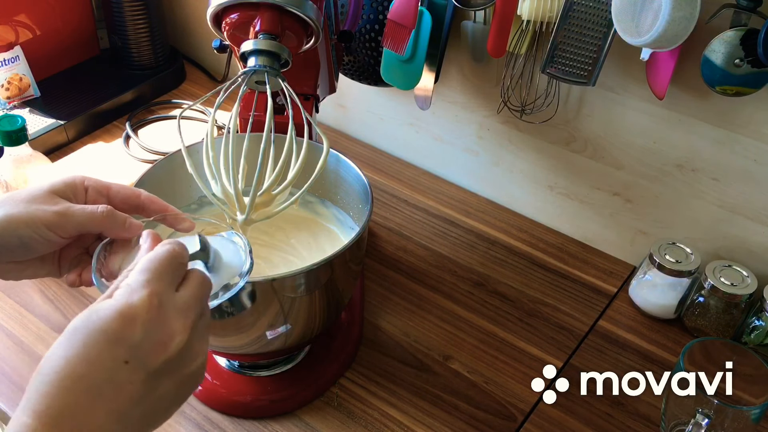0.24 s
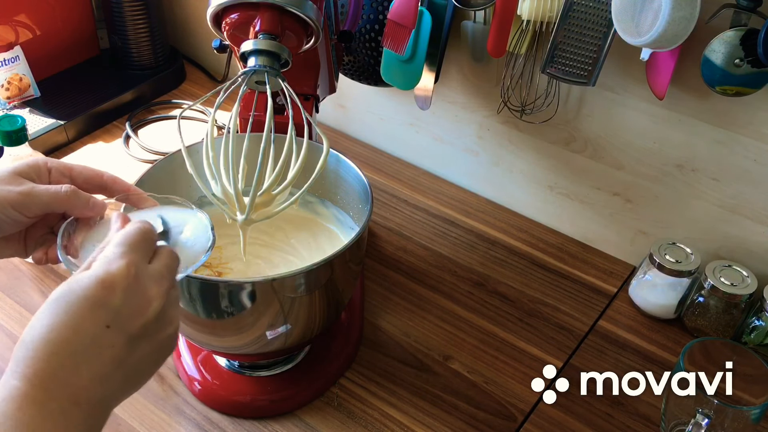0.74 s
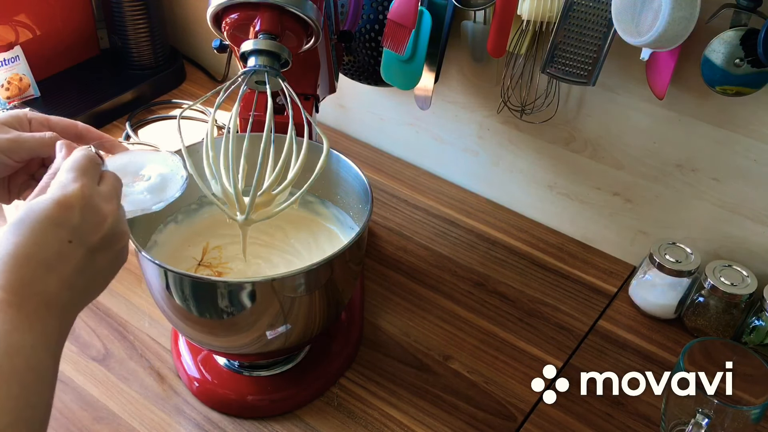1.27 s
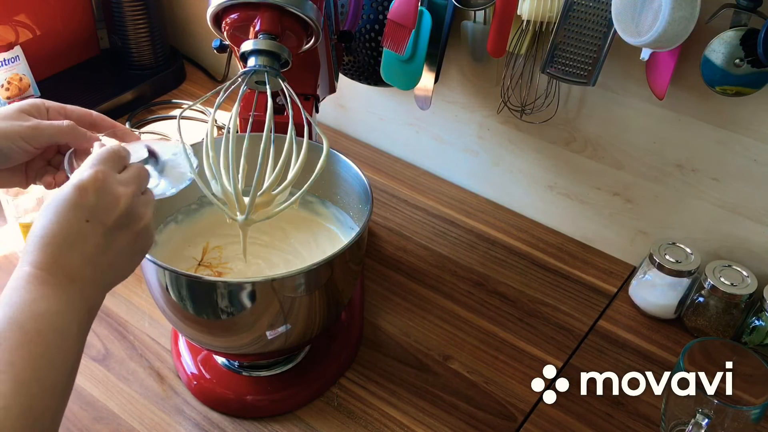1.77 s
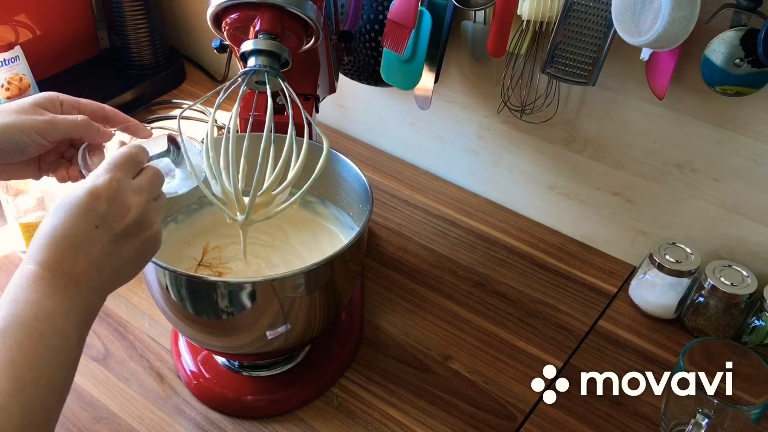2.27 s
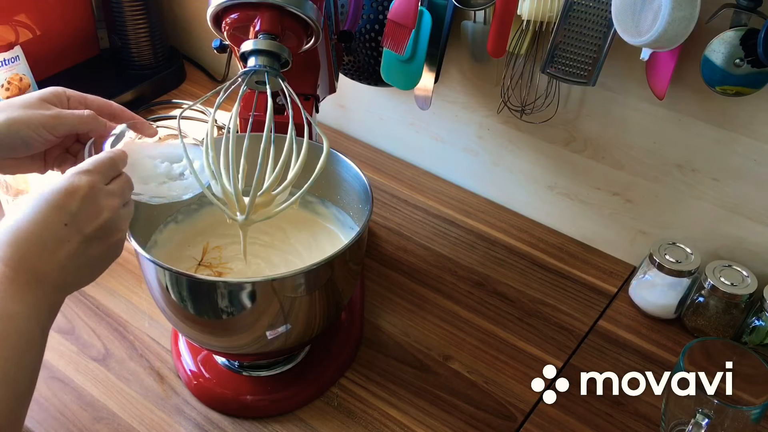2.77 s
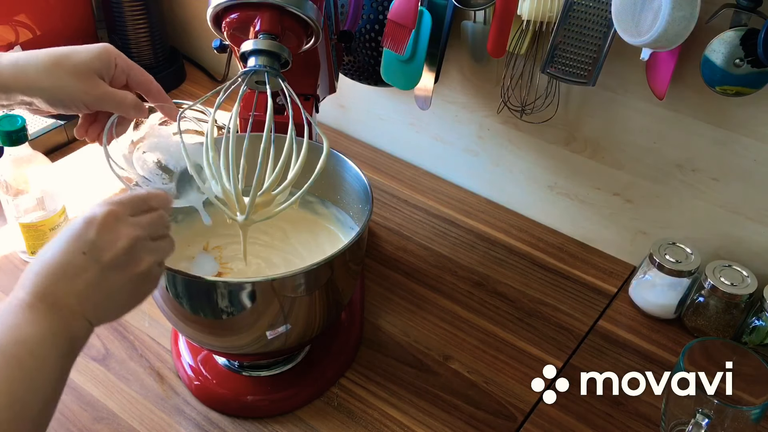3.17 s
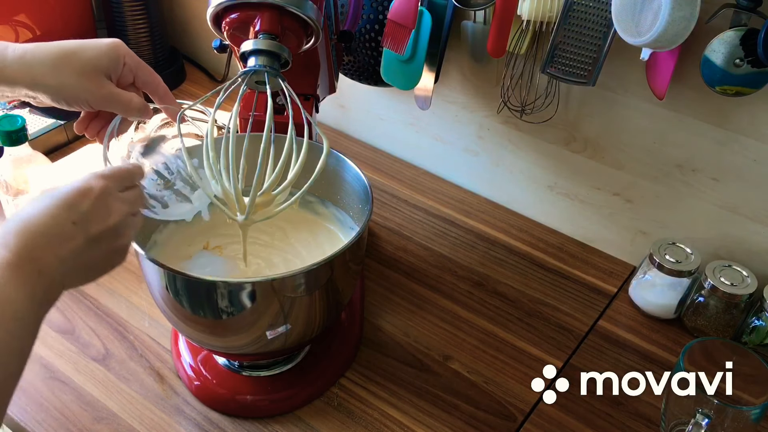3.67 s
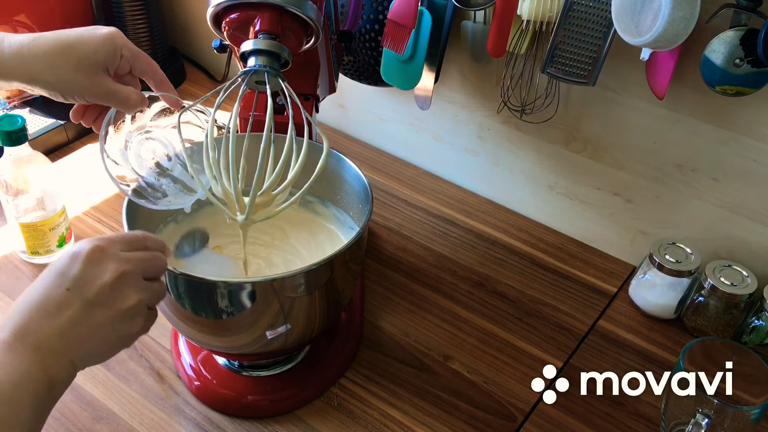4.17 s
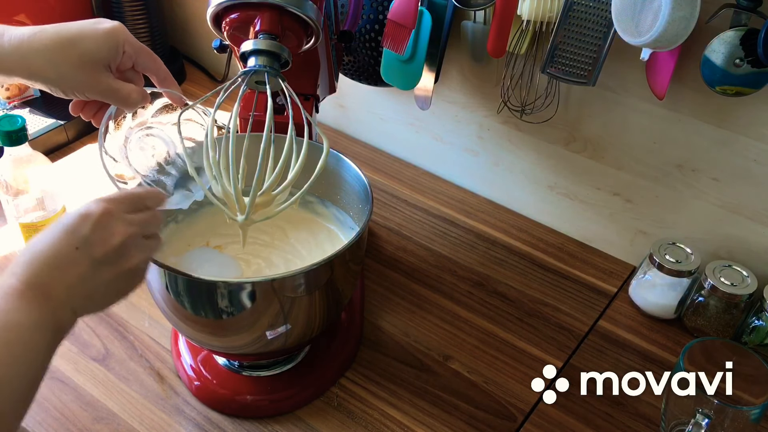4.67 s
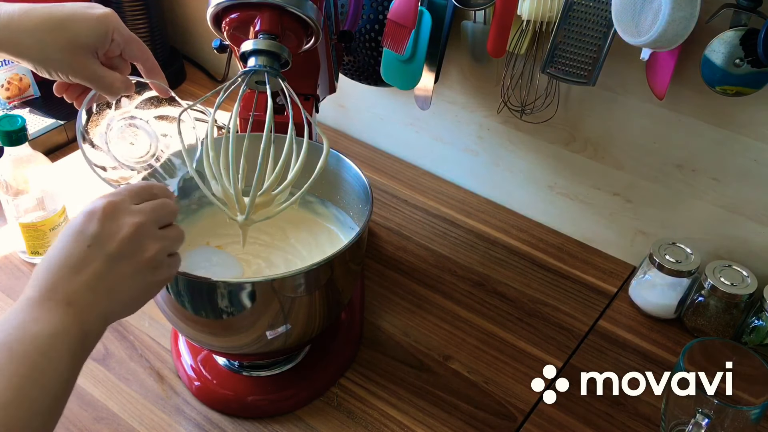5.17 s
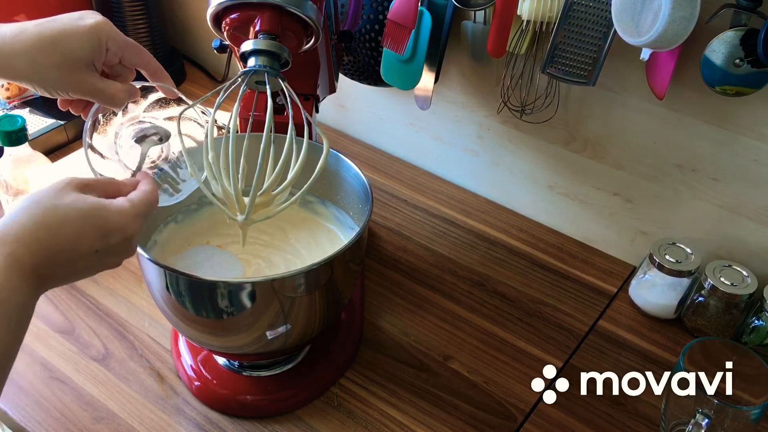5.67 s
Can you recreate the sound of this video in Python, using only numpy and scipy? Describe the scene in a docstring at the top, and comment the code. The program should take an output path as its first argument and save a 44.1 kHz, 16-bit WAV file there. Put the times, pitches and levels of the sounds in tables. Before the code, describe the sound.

Faint glassy ticks grow into brighter clinks and scrapes, with four quick metallic knocks on a bowl rim and two more near the end.

```python
"""A spoon stirs paste in a small glass dish, scrapes it out over a steel mixing bowl and is
knocked clean on the rim. Touches and stick-slip strokes ring the glass modes; each rim knock
is a noise crack, steel rings and a slower thud of the stand.
Behind: wavering fridge tones, a rumble, room tone and hiss. Kitchen walls add decaying noise."""
import sys
import numpy as np
from scipy import signal
from scipy.fft import rfft, irfft
from scipy.io import wavfile

SR = 44100
rng = np.random.default_rng(int(sys.argv[2]) if len(sys.argv) > 2 else 0)


def generate_wav(signal):
    """Clip the signal to [-1, 1] and save it as 16-bit WAV at the path in sys.argv[1]."""
    frames = np.transpose(np.atleast_2d(signal))
    scaled = np.clip(frames, -1, 1) * 32767
    pcm = np.round(scaled).astype(np.int16)
    wavfile.write(sys.argv[1], SR, pcm)


N = 261513

# Fridge tones: (frequency [Hz], level before the deep-tone trim [dB])
FRIDGE_TONES = [(70.0, -79.5), (101, -84.5), (123.8, -80.5), (204.6, -61), (349.9, -70.5), (409.1, -69),
                (699.8, -79.5), (1109, -83.5), (1265, -77.5), (1541, -77.5), (1857, -92)]
# Room tone and microphone hiss: (frequency [Hz], relative density [dB per Hz])
AIR_SPECTRUM = [(40, -47), (70, -13), (160, -10.5), (250, -15), (330, -9.5), (500, -14.5), (700, -12),
                (870, -20), (1550, -16.5), (2200, -23), (4500, -25.5), (5400, -32), (6300, -23),
                (8700, -24), (10100, -23), (11500, -17), (14000, -12.5), (15700, -13.5), (16100, -54)]
# Treble of the room tone: (time [s], level [dB])
AIR_TREBLE = [(0, -0.5), (.8, 0), (1.5, -2.5), (3.6, -5), (4.3, -5), (5.93, -6)]
# Far rumble near 120 Hz, comes and goes: (time [s], level [dB])
RUMBLE_LEVEL = [(0.0, -67.5), (1.15, -75), (1.35, -63.5), (1.55, -69), (1.98, -55.5), (2.2, -69),
                (2.6, -69), (3.0, -70), (3.5, -75), (3.73, -96), (4.9, -74), (5.1, -83.5), (5.93, -76.5)]
# Decay of the kitchen reflections: (frequency [Hz], t60 [s])
KITCHEN_DECAY = [(300, 0.19), (1500, 0.12), (4000, 0.13), (9000, 0.11), (15000, 0.11)]
# Spoon on the rim: (time [s], level [dB], thud [dB], ring [dB], second contact lag [s],
# second contact [dB], extra at 2322 Hz [dB], at 4188 Hz [dB], at 6239 Hz [dB]); extras follow the struck spot
RIM_KNOCKS = [(3.9569, -7, 4.5, -7.5, 0.002, 3, 0, 6.5, -5),
              (4.0278, -9, 3, -8.5, 0.0024, -0.5, -0.5, 4.5, 2),
              (4.1039, -7, 1, -7, 0.00063, -2.5, -1, 2.5, -4),
              (4.169, -6, -0.5, -11, 0.0018, -4.5, -6, 1, 0),
              (5.224, -5.5, 2.5, -4.5, 0.00215, -0.5, -10.5, -12.5, -2.5),
              (5.2896, -6.5, 1, -6.5, 0.0016, -2.5, -5, -0.5, -7)]
# Clear rings of steel bowl and spoon: (frequency [Hz])
STEEL_HZ = [1443, 1665, 2322, 2760, 3278, 3614, 4188, 4570, 4950, 5313, 5548, 5992, 6239, 6379, 8910, 9015,
            9125, 9230, 9420, 12830, 15200]
# The same rings in the same order: (level [dB], t60 [s], swell [s])
STEEL_RINGS = [(-28.5, 0.22, 0.0062), (-32.5, 0.26, .03), (-11.5, 0.25, 0.065), (-28, 0.083, .01),
               (-22.5, 0.077, 0.013), (-16.5, 0.12, 0.06), (-6, 0.082, 0.021), (-33.5, 0.2, .012),
               (-26, 0.088, 0.014), (-36.5, 0.38, .012), (-27, 0.28, .012), (-30, 0.14, .012),
               (-23.5, 0.33, .012), (-28, .09, 0.0087), (-31, 0.1, .008), (-9, 0.11, 0.0073),
               (-36, 0.093, .008), (-29.5, 0.066, .008), (-31, 0.062, .008), (-30.5, 0.071, .008),
               (-32, 0.115, .008)]
# Bowl full of batter rocking on stand and worktop: (frequency [Hz], level [dB], t60 [s])
STAND_MODES = [(89, -52.5, 0.22), (116.5, -46.5, 0.72), (163, -35.5, 0.065), (220, -40, 0.13),
               (310.3, -30.5, 0.077), (374.3, -28, .1), (419, -28.5, 0.045), (449, -22, 0.05),
               (505, -26.5, 0.045), (604, -30.5, 0.062), (701, -28, 0.094), (748, -19.5, 0.063),
               (895, -11.5, 0.043), (917, -18, 0.07), (1049, -23.5, 0.062), (1126, -28.5, 0.049)]
# Crack of the knocks: (frequency [Hz], relative density [dB per Hz])
CRACK_SPECTRUM = [(900, -25.5), (1500, -15), (3000, -8.5), (4200, -5), (5200, -3.5), (6300, 3), (7500, -11),
                  (8300, 0.5), (9100, 14), (10200, -2), (11500, 2.5), (13000, 1.5), (15200, 8), (16300, 0)]
# Spoon touching the dish: (time [s], level [dB], strongest middle ring [Hz], low rings [dB],
# upper rings [dB], top rings [dB], strongest top ring [Hz])
DISH_TOUCHES = [(0.03, -36, 4100, -3.5, -10, -16, 14100), (0.1518, -49, 2590, -4, -3, -6, 13800),
                (0.2466, -43.5, 3800, 3, -18, -6, 11000), (0.357, -54.5, 2540, -1.5, -7, 4, 10600),
                (0.4549, -44.5, 4300, -2.5, -2, -7, 14100), (0.5836, -43, 4150, -2, -2, -7, 10700),
                (0.603, -44, 2520, -9, -3, -5, 12400), (0.7058, -42.5, 4250, -5, 7.5, 2, 14300),
                (0.833, -49, 3770, -10, 1.5, 1, 10500), (0.954, -49, 3330, -1, -8, -9, 13600),
                (1.039, -50, 3500, -12, -3, -5, 10800), (1.1516, -49, 3570, 2, -3, -4, 11900),
                (1.2797, -48.5, 4540, -4, -2, -1, 11400), (1.387, -42, 3900, -7, -10, -5, 14100),
                (1.496, -41, 3880, -1, -11, -8, 15600), (1.6058, -56.5, 4280, 8.5, 2, 7, 14000),
                (1.7288, -33.5, 3900, -5, -2, -17, 14000), (1.8275, -47.5, 3060, 2.5, -9, 0, 12300),
                (1.9403, -24.5, 4120, -12.5, -9.5, -18, 14300),
                (2.0486, -28.5, 3770, -10.5, -13, -14, 12900), (2.162, -31.5, 4020, -6, -17, -17, 11600),
                (2.2826, -41, 3750, -4, -11, -5, 10800), (2.3905, -46.5, 3290, -2, -5, -8, 10800),
                (2.4973, -22.5, 4060, -10.5, -23, -28, 13900), (2.7606, -30.5, 4230, -21, -11, -11, 11800),
                (2.824, -49, 3900, -19, -1, 1, 11100), (2.925, -47.5, 4000, -13, -16, 1, 12500),
                (3.052, -20, 4080, -18, -5.5, -15, 11800), (3.0977, -40, 4300, -27, -14, -6, 13600),
                (3.1137, -11.5, 4200, -37, -2, -5, 13900), (3.2197, -44.5, 3700, -3, 3.5, 7, 12700),
                (3.2901, -32, 3800, -12, 0.5, 2.5, 13800), (3.3204, -36.5, 3820, -4.5, 0, 3, 13900),
                (3.3865, -39, 3700, -5, 6.5, 4, 12200), (3.4424, -35, 4500, -40, 16, 12, 13800),
                (3.5213, -23.5, 3900, -12.5, -8, -8.5, 12200), (3.5453, -20, 4540, -15, 1.5, 2, 11200),
                (3.6356, -24.5, 4930, -16, -6.5, -6.5, 12400), (3.648, -29, 4700, -19, -12, -9, 12100),
                (3.671, -14, 3060, -38, -4, -0.5, 10770), (3.7636, -16.5, 3840, -20.5, -14, -12, 12100),
                (3.795, -31.5, 4670, -15, -3, -2, 14700), (3.8188, -39.5, 3200, -15, 4.5, -1, 13900),
                (4.3214, -15.5, 3280, -22, -8.5, -15, 11200), (4.345, -28.5, 3360, -33, -8, -10, 11000),
                (4.36, -26.5, 3550, -42, -8, -8.5, 11300), (4.3958, -32.5, 5030, -33, 2, -1, 14100),
                (4.4146, -46, 4150, -24, 6, 8, 14000), (4.477, -22.5, 3670, -15.5, -17, -11, 12300),
                (4.5148, -20, 3430, -26, -2, -5, 11100), (4.5422, -33, 5830, -25, -3, -3, 12700),
                (4.608, -28.5, 2860, -13.5, -28, -19, 12200), (4.6312, -28.5, 3670, -29, -8.5, -12, 11600),
                (4.659, -39.5, 5850, -16, 0, -4, 13900), (4.7232, -33.5, 3250, -16, -11, -17.5, 11000),
                (4.7656, -45.5, 4480, -17, 2, 9, 14800), (4.796, -41.5, 2780, -7.5, 8, 1, 11100),
                (4.8371, -17.5, 2900, -22, 1.5, -5, 14200), (4.8633, -41, 4040, -25, 5, 3, 13900),
                (4.998, -23.5, 4290, -26, 9, 3.5, 14000), (5.066, -41, 4400, -15, 1, 2, 13900),
                (5.4015, -13.5, 3530, -25, -5, -6.5, 12700),
                (5.4629, -15.5, 6720, -21.5, -16, -13.5, 11700), (5.607, -45, 2900, -13, -21, -9, 14800),
                (5.6302, -24, 3200, -15, -7.5, -10, 12360), (5.7147, -39.5, 6150, -26, -7, -5, 10700),
                (5.7412, -42, 6160, -31, -1, -8, 11000), (5.7976, -45.5, 3300, -24, -1, -19, 11100),
                (5.885, -22, 2730, -20, -12.5, -7, 12500), (5.9159, -24.5, 5150, -25, -10.5, -7, 11900)]
# Spoon edge dragged over the glass: (start [s], end [s], start level [dB], end level [dB])
DRAG_STROKES = [(0.589, .62, -54, -65), (2.296, 2.344, -52, -57), (2.813, 2.884, -49, -63),
                (2.907, 2.99, -52, -58), (3.057, 3.117, -57, -43), (3.13, 3.177, -38, -58),
                (3.217, 3.283, -69, -46), (3.3, 3.382, -58, -62), (3.41, 3.431, -61, -47),
                (3.435, 3.443, -47, -40), (3.761, 3.844, -48, -66), (4.304, 4.402, -63, -55),
                (4.405, 4.424, -44, -68), (4.511, 4.568, -43, -76), (4.635, 4.685, -56, -67),
                (4.723, 4.774, -58, -57), (4.86, 4.876, -38, -67), (5.058, 5.092, -45, -76),
                (5.4, 5.46, -27, -64), (5.73, 5.797, -48.5, -47.5), (5.894, 5.915, -63, -62)]
# Dish rings, damped by fingers and paste: (frequency [Hz], level [dB], t60 [s])
GLASS_RINGS = [(1048, -3, 0.0084), (1139, -3.5, 0.014), (1386, 3, 0.0068), (1645, -8, 0.038),
               (1880, -7.5, 0.037), (2270, 5.5, 0.0058), (2960, 2, 0.0017), (3204, -6, 0.0087),
               (3380, 0, 0.0037), (3937, -1, 0.0045), (4308, -2, 0.0092), (4886, -5, 0.0108),
               (5220, 2, 0.00346), (5870, -18, 0.04), (6160, 0, 0.0059), (6600, -33, 0.0012),
               (7120, -9, 0.018), (7930, 0, 0.0059), (8640, -5.5, 0.022), (9200, -1, .008),
               (11030, 5.5, 0.005), (11140, -4, 0.01), (11850, -1.5, 0.0091), (12630, -4, 0.0082),
               (13300, -4, 0.01), (13420, -7.5, 0.0074), (13830, 1, 0.011), (15400, 2.5, 0.0076)]

ROOM_DB, HISS_DB, RUMBLE_LUMPS_DB = -56.5, -70, 2
# tones below DEEP_BELOW_HZ fall away once
DEEP_BELOW_HZ, DEEP_TRIM_DB, DEEP_DROP_DB, DEEP_DROP_S, DEEP_FADE_S = 110, 10.5, 18, 3.62, .06
UPPER_RING_HZ, UPPER_SPREAD_HZ = 8710, 296   # strongest upper ring, varied at random from touch to touch
MIDDLE_FOCUS_DB, FOCUS_DB_PER_TOP_DB = 9, 0.52   # middle ring stands out less on bright touches
# share to the walls at a -31.5 dB touch; hard touches send less
WALL_SHARE_DB, WALL_DROP_DB_PER_DB = -3, 0.3
EMPTIED_S, PASTE_DAMPS_DB = 2.65, 1   # paste muffles the wall share until tipped out
LOW_RING_FULL_HZ, LOW_RING_EMPTY_HZ = 1210, 1660   # strongest low ring
STROKE_TREBLE_DB, STROKE_TREBLE_DB_PER_TOP_DB = 0.5, 0.27
STOPBAND_HZ = 17100


def from_db(db):
    """Decibels to amplitude gain."""
    return 10 ** (np.asarray(db) / 20)


def rms_one(x):
    """Scale to unit rms."""
    return x / np.sqrt(np.mean(x ** 2) + 1e-20)


def butter(x, order, hz, kind="low"):
    """Butterworth filter; a band takes two corners."""
    return signal.sosfilt(signal.butter(order, hz, kind, fs=SR, output="sos"), x)


def in_time(rows):
    """A (time, level) table, one value per sample."""
    s, level = np.transpose(rows)
    return np.interp(np.arange(N) / SR, s, level)


def at_hz(points, hz):
    """A frequency table read on a log-frequency axis."""
    table_hz, value = np.transpose(points)
    return np.interp(np.log(np.maximum(hz, 1)), np.log(table_hz), value)


def coloured(x, spectrum):
    """Weight a noise by a spectrum table."""
    gain = from_db(at_hz(spectrum, np.fft.rfftfreq(len(x), 1 / SR)))
    return irfft(rfft(x) * gain, len(x))


def drift(rate_hz):
    """Random curve: straight lines between unit-spread knots, rate_hz knots a second."""
    knots = rng.standard_normal(int(N / SR * 60) + 2)
    return np.interp(np.arange(N) / SR * np.clip(rate_hz, .1, 59), np.arange(len(knots)), knots)


def ring(clicks, hz, t60_s):
    """Two-pole resonator: a unit click starts a decaying sine of about unit height."""
    r = from_db(-60 / (t60_s * SR))
    w = 2 * np.pi * hz / SR
    return signal.lfilter([0, np.sin(w)], [1, -2 * r * np.cos(w), r * r], clicks + 1e-18)


def clicks_at(times_s, gains):
    """Single-sample clicks."""
    out = np.zeros(N)
    np.add.at(out, np.minimum(np.round(np.asarray(times_s) * SR).astype(int), N - 1), gains)
    return out


def fridge_hum():
    """Steady sines wavering in level and phase; the deepest drop in level once."""
    t = np.arange(N) / SR
    deep_db = DEEP_TRIM_DB - DEEP_DROP_DB * np.clip((t - DEEP_DROP_S) / DEEP_FADE_S, 0, 1)
    tones = np.zeros(N)
    for hz, tone_db in FRIDGE_TONES:
        level = from_db(tone_db + 1.0 * drift(20) + deep_db * (hz < DEEP_BELOW_HZ))
        wander = .5 * np.cumsum(drift(23)) * 7.8 / SR * hz / 200   # [rad]
        tones += np.sqrt(2) * level * np.sin(2 * np.pi * hz * t + wander + rng.uniform(0, 5.9))
    return tones


def far_rumble():
    """Narrow-band noise with a lumpy level."""
    noise = rms_one(butter(rng.standard_normal(N), 2, [112, 134], "band"))
    return from_db(in_time(RUMBLE_LEVEL) + RUMBLE_LUMPS_DB * drift(6.68)) * noise


def air_and_hiss():
    """Coloured noise: steady lows, treble that changes level, steady microphone hiss on top."""
    air = rms_one(coloured(rng.standard_normal(N), AIR_SPECTRUM))
    low = butter(air, 2, 2500)
    treble = from_db(in_time(AIR_TREBLE)) * butter(air - low, 4, 10300)
    hiss = butter(air, 4, 10300, "high")
    return from_db(ROOM_DB) * (low + treble) + from_db(HISS_DB) * hiss


def kitchen(x):
    """Dense reflections: noise dying band by band, starting 1 ms after the direct sound."""
    t = np.arange(SR // 2) / SR
    edges_hz = 100 * 2 ** np.arange(0, 7.4, .73)
    tail = np.zeros(len(t))
    for low_hz, high_hz in zip(edges_hz, edges_hz[1:]):
        band = butter(rng.standard_normal(len(t)), 2, [low_hz, high_hz], "band")
        tail += band * from_db(-60 * t / at_hz(KITCHEN_DECAY, np.sqrt(low_hz * high_hz)))
    tail *= np.clip((t - .001) / 0.00033, 0, 1)
    return signal.fftconvolve(x, tail / np.sqrt(np.sum(tail ** 2)))[:N]


def rim_rings():
    """Each knock swells steel and stand modes; the next knock stills them."""
    s, peak_db, thud_db, ring_db, _, _, *spot_db = np.transpose(RIM_KNOCKS)
    spot_db = dict(zip([2322, 4188, 6239], spot_db))
    modes = [(hz, *row, ring_db + spot_db.get(hz, 0)) for hz, row in zip(STEEL_HZ, STEEL_RINGS)]
    modes += [(*row, .025, thud_db) for row in STAND_MODES]   # heavy parts answer slowly
    out, t = np.zeros(N), np.arange(SR // 2) / SR
    scatter, phases = rng.standard_normal((2, len(s), len(modes)))
    for i, (start_s, next_s) in enumerate(zip(s, np.r_[s[1:], np.inf])):
        blow = np.zeros(len(t))
        for k, (hz, level_db, t60_s, swell_s, extra_db) in enumerate(modes):
            envelope = from_db(-60 * t / t60_s) - from_db(-60 * t / swell_s)
            gain = from_db(peak_db[i] + level_db + extra_db[i] + 2.0 * scatter[i, k])
            phase = np.pi * k + 0.59 * phases[i, k]   # neighbours swing opposite ways
            blow += gain * envelope * np.sin(2 * np.pi * hz * t + phase)
        blow *= from_db(-25 * np.clip((t - (next_s - start_s)) / 0.0032, 0, 1))
        first = round(start_s * SR)
        out[first:first + len(t)] += blow[:N - first]
    return out


def rim_crack():
    """Two contacts 0.6-2.4 ms apart: a steel snap, a short noise crack and a longer rattle."""
    s, peak_db, _, _, lag_s, second_db, *_ = np.transpose(RIM_KNOCKS)
    contacts = clicks_at(np.r_[s, s + lag_s], from_db(np.r_[peak_db, peak_db + second_db]))
    snap = from_db(5.5) * ring(contacts, 12800, .003) - from_db(3.0) * ring(contacts, 15240, 0.0015)
    pulses = signal.lfilter(np.hanning(30) / 15, 1, contacts)
    fast, slow = from_db(-60 / (0.0133 * SR)), from_db(-60 / (.09 * SR))
    envelope = from_db(-10.0) * signal.lfilter([1], [1, -fast], pulses)
    envelope += from_db(-16) * signal.lfilter([1], [1, -slow], pulses)   # rattle of dense high modes
    crack = envelope * rms_one(coloured(rng.standard_normal(N), CRACK_SPECTRUM))
    return butter(snap, 2, 11000, "high") + butter(crack, 2, 1200, "high")


def drag_grains(touch_s, mid_hz, top_db):
    """The edge sticks and slips: uneven grains, silent between strokes, coloured like the nearest touch."""
    level_db, focus_hz, treble_db = np.full(N, -200.), np.full(N, 4000.), np.zeros(N)
    for start_s, end_s, first_db, last_db in DRAG_STROKES:
        touch = np.argmin(np.abs(touch_s - start_s))
        inside = slice(round(start_s * SR), round(end_s * SR))
        level_db[inside] = np.linspace(first_db, last_db, inside.stop - inside.start)
        focus_hz[inside] = mid_hz[touch]
        treble_db[inside] = STROKE_TREBLE_DB + STROKE_TREBLE_DB_PER_TOP_DB * top_db[touch]
    slips = rng.random(N) < 1500 / SR   # 1500 a second on average
    grains = rms_one(slips * from_db(2.4 * np.minimum(rng.exponential(1, N), 4)))
    live = grains * (level_db > -199) > 0
    level_db = level_db - 28.5 + 2.5 * drift(50)
    return live, grains[live], level_db[live], focus_hz[live], treble_db[live]


def dish():
    """Touches and dragged edge excite the same glass rings; returns direct sound and wall share."""
    s, peak_db, mid_hz, low_db, upper_db, top_db, top_hz = np.transpose(DISH_TOUCHES)
    full = s < EMPTIED_S
    focus_db = np.maximum(MIDDLE_FOCUS_DB - FOCUS_DB_PER_TOP_DB * top_db, 0)
    wall_db = WALL_SHARE_DB - WALL_DROP_DB_PER_DB * (peak_db + 31.5) - PASTE_DAMPS_DB * full
    low_hz = np.where(full, LOW_RING_FULL_HZ, LOW_RING_EMPTY_HZ)
    shape = (len(s), len(GLASS_RINGS))
    scatter = rng.standard_normal(shape)
    upper_hz = UPPER_RING_HZ + UPPER_SPREAD_HZ * rng.standard_normal(len(s))
    late = rng.random(shape)
    signs = rng.choice([-1, 1], shape)
    live, grains, drag_db, drag_hz, treble_db = drag_grains(s, mid_hz, top_db)
    out = np.zeros((2, N))
    for k, (hz, level_db, t60_s) in enumerate(GLASS_RINGS):
        family = np.searchsorted([2500, 6500, 10000], hz)   # low, middle, upper, top
        share_db = [low_db - 1.0, 0, upper_db, top_db][family]
        best_hz = [low_hz, mid_hz, upper_hz, top_hz][family]
        # quieter away from the family's strongest ring
        distance = np.clip(np.maximum((best_hz - hz) / 1100, (hz - best_hz) / 700), 0, 1)
        nearness_db = -[8, focus_db, 11, 12][family] * distance
        force = signs[:, k] * from_db(peak_db + share_db + nearness_db + 1.3 * scatter[:, k])
        at_s = s + .0006 * late[:, k]   # each ring up to 0.6 ms late at random: a grainy onset
        mid_slip_db = -9 * np.minimum(np.abs(hz - drag_hz) / 1200, 1)
        slip_db = [-15, mid_slip_db, treble_db - 3.5, 1.5 * treble_db - 6][family]
        slips = np.zeros(N)
        slips[live] = grains * rng.standard_normal(N)[live] * from_db(drag_db + slip_db)
        strikes = np.array([clicks_at(at_s, force), clicks_at(at_s, force * from_db(wall_db))]) + slips
        # a band-pass around each ring keeps its sound narrow
        narrow = butter(ring(strikes, hz, t60_s), 1, [0.74 * hz, 1.274 * hz], "band")
        out += from_db(level_db) * narrow
    return butter(out, 4, 950, "high")   # a small dish radiates no bass


def scene():
    """Dish and bowl close by, their reflections and the background."""
    glass, wall_share = dish()
    steel = rim_rings() + rim_crack()
    echoes = kitchen(wall_share + from_db(-8.5) * steel)
    echoes = butter(echoes, 8, 15800)   # echoes fall off steeply above 15.8 kHz
    background = fridge_hum() + air_and_hiss() + far_rumble()
    return (glass + steel + echoes + background)[None]


def record(dry):
    """Deep bass thinned, highest peaks rounded, nothing above about 17 kHz."""
    thin = butter(dry, 2, 58, "high")
    rounded = thin / (1 + np.abs(thin / .79) ** 6) ** (1 / 6)
    return signal.sosfilt(signal.cheby2(12, 70, STOPBAND_HZ, fs=SR, output="sos"), rounded)


dry = scene()
out = record(dry)
generate_wav(out)
```